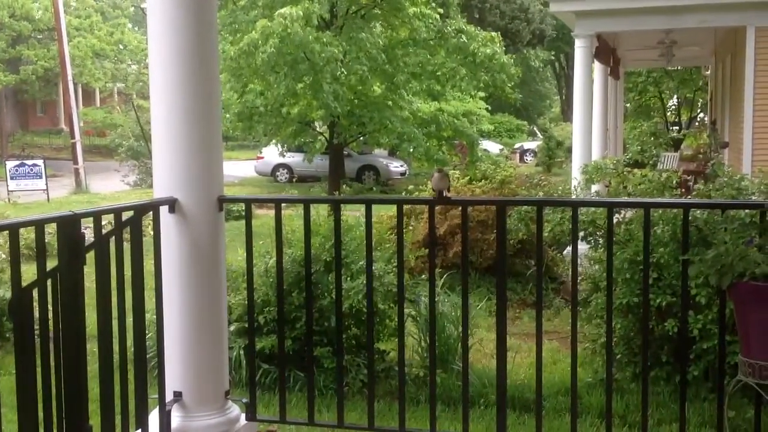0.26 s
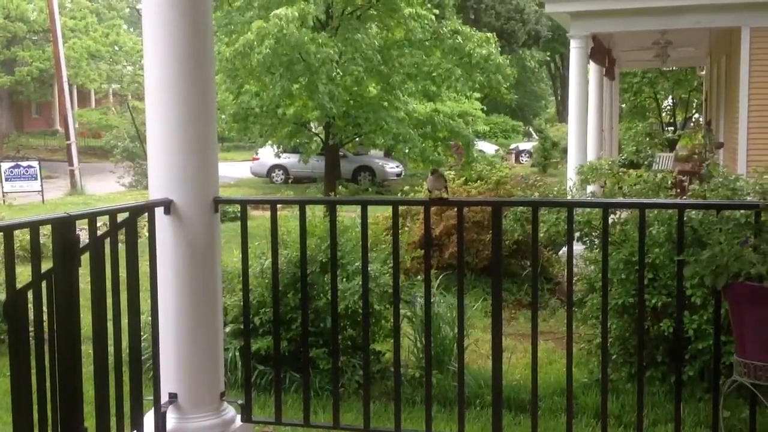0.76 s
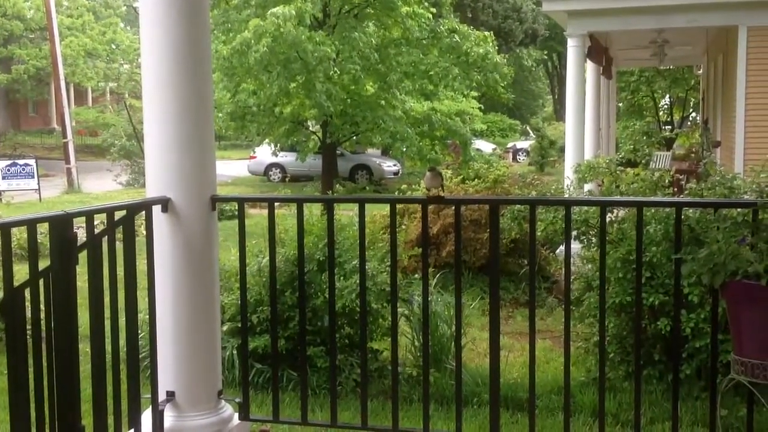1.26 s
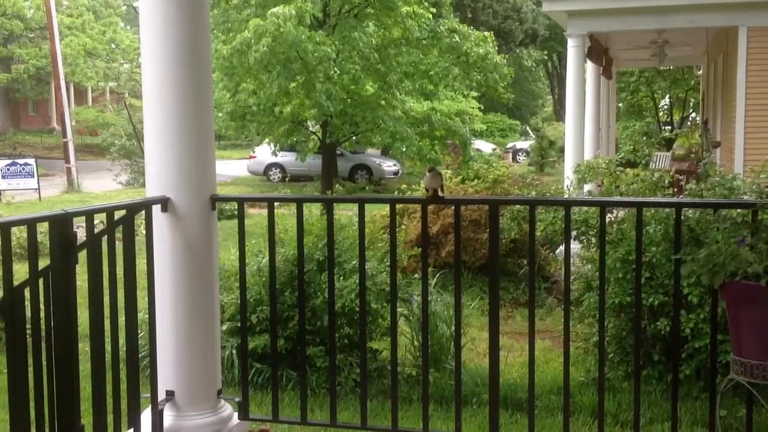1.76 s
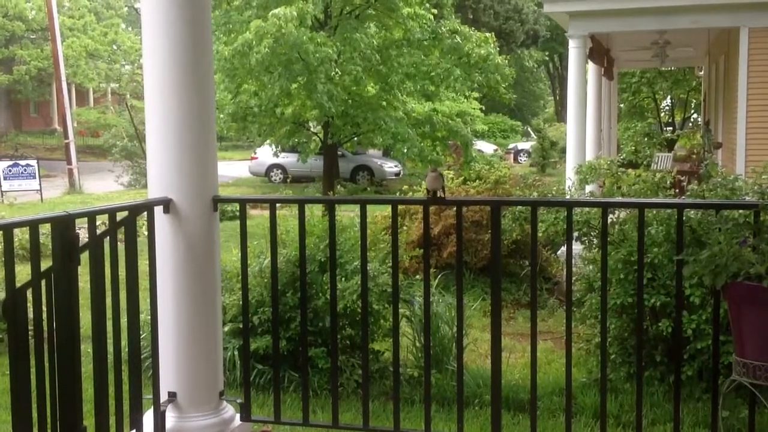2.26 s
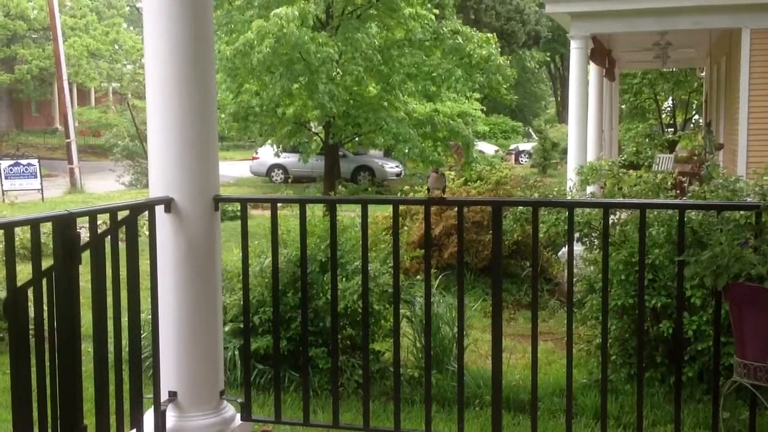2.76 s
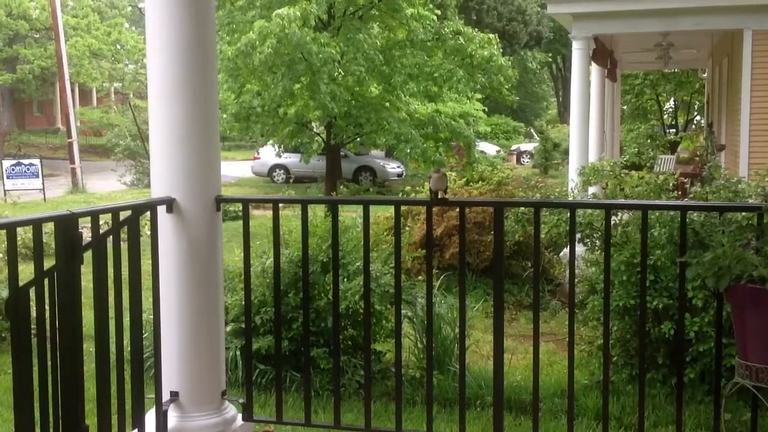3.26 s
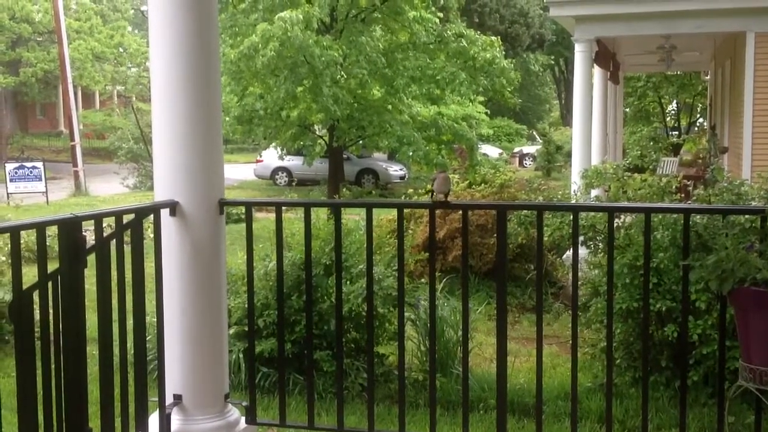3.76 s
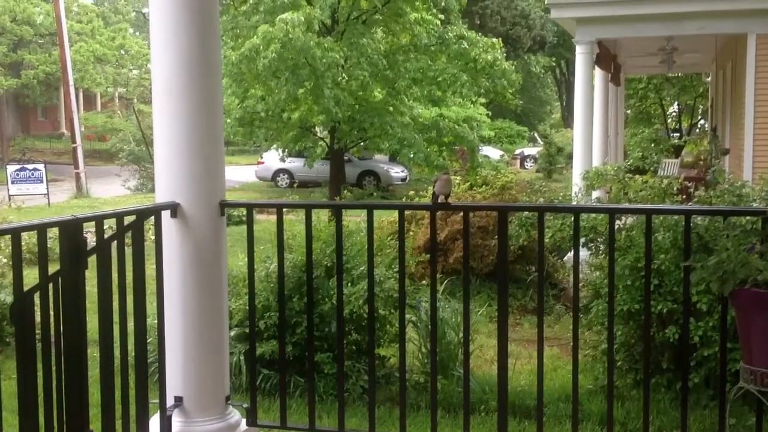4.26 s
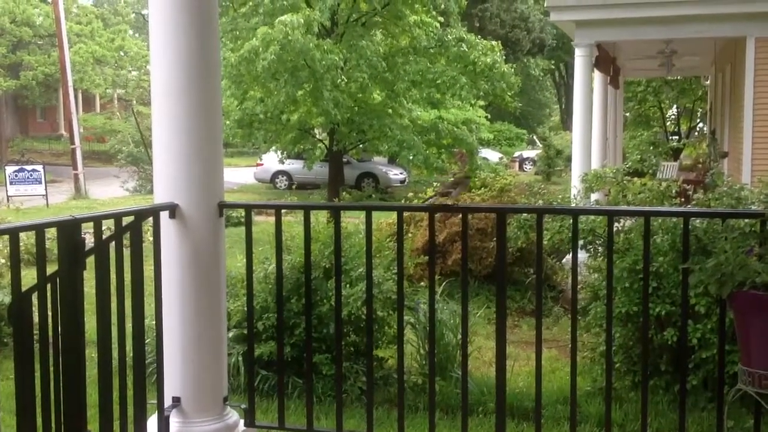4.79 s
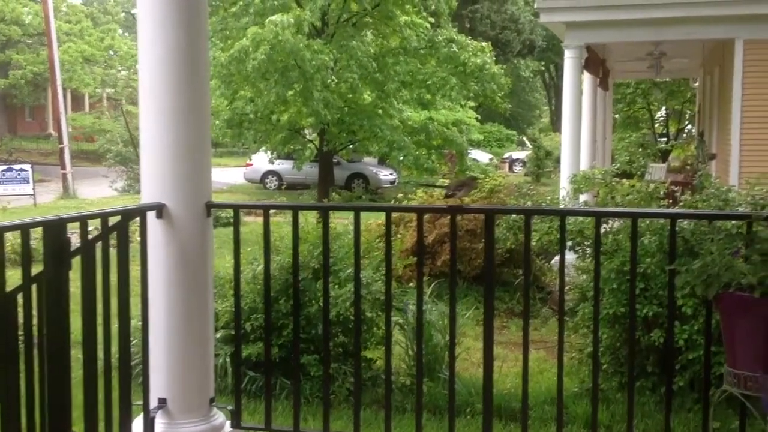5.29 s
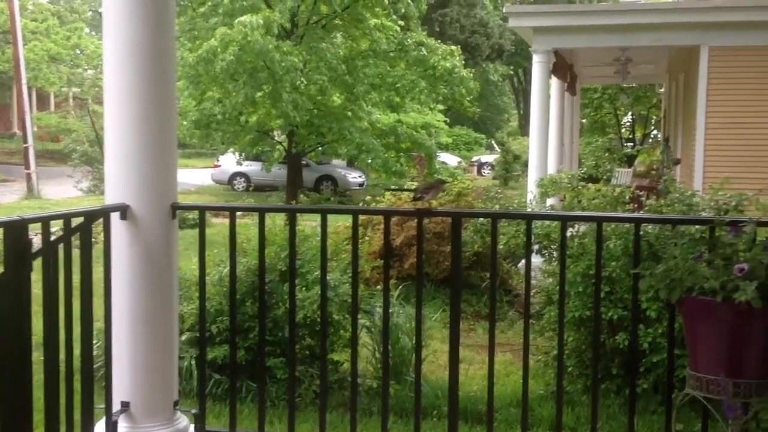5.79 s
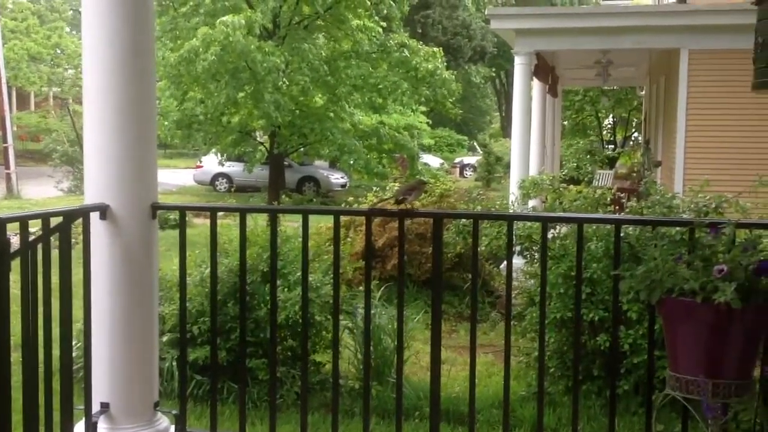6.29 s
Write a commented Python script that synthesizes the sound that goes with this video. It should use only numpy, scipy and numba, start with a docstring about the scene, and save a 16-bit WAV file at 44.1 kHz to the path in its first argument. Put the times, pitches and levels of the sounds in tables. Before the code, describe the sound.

A mockingbird on a porch railing gives six short, harsh, rasping barks: three about a second apart, then a two-second pause, then three more. Each has a quick, slight echo from the porch. Behind it, distant songbirds whistle and chirp faintly over a soft, steady wash of far traffic and leaves. A few tiny handling clicks come from the microphone on the porch.

```python
"""Far songbirds whistle in a garden over a faint town hum; a few small handling clicks come and go.
Then a mockingbird on a porch railing scolds with six harsh, rasping barks.
One side of its syrinx holds a sagging tone while the other flaps chaotically;
throat, windpipe and beak colour both, and the porch echoes them."""
import sys
import numpy as np
from scipy import signal
from scipy.fft import rfft, irfft, next_fast_len
from scipy.io import wavfile
from numba import njit

SR = 44100
rng = np.random.default_rng(int(sys.argv[2]) if len(sys.argv) > 2 else 0)


def waveform_to_disk(signal):
    """Save audio, clipped to [-1, 1], as 16-bit WAV at the path in sys.argv[1]."""
    frames = np.transpose(np.atleast_2d(signal))
    scaled = np.clip(frames, -1, 1) * 32767
    samples = np.round(scaled).astype(np.int16)
    wavfile.write(sys.argv[1], SR, samples)


N = 288414
TIME_S = np.arange(N) / SR


def undb(db):
    """Decibels to gain."""
    return 10 ** (np.asarray(db) / 20)


def unit(x):
    """Scale to rms 1."""
    return x / np.sqrt(np.mean(x ** 2))


def colour(x, points):
    """Filter by a spectrum of (f/Hz, gain/dB) points."""
    hz, db = np.transpose(points)
    size = next_fast_len(len(x) + 2048)
    bins_hz = np.maximum(np.fft.rfftfreq(size, 1 / SR), 1)
    gain = undb(np.interp(np.log(bins_hz), np.log(hz), db))
    return irfft(rfft(x, size) * gain, size)[:len(x)]


def walk(t, rate_hz):
    """Random wander of rms 1, with rate_hz new targets a second."""
    steps = (t - t[0]) * rate_hz
    return unit(np.interp(steps, np.arange(len(t)), rng.standard_normal(len(t))))


@njit
def resonance(x, hz, width_hz):
    """State-variable band-pass with a moving centre."""
    y, band_state, low_state = np.empty(len(x)), 0., 0.
    for i in range(len(x)):
        g, damping = np.tan(np.pi * hz[i] / SR), width_hz / hz[i]
        band = (band_state + g * (x[i] - low_state)) / (1 + g * (g + damping))
        band_state = 2 * band - band_state
        low_state += 2 * g * band
        y[i] = damping * band
    return y


def echoes(x, t60_s, gap_s, dull_hz):
    """Dense reflections of unit energy: a gap, then a decay with softened treble."""
    t = TIME_S[:SR]
    tail = rng.standard_normal(SR) * np.exp(-np.log(1000) * t / t60_s) * (t > gap_s)
    tail = signal.sosfilt(signal.butter(1, dull_hz, fs=SR, output="sos"), tail)
    return signal.fftconvolve(x, tail / np.linalg.norm(tail))[:N]


# Town noise spectrum: f/Hz, relative density/dB
TOWN_SPECTRUM = [(18, -78), (30, -35), (154, -3), (240, -0.5), (426, -5), (662, -3.5), (754, -7.5),
                 (1920, -8), (2560, -14.5), (2770, -15), (3780, -13.5), (4540, -18), (6700, -21),
                 (8690, -24.5), (15000, -27)]


def town(level_db=-57.5, split_hz=700):
    """Far traffic and leaves: a soft wash whose low part wavers under a nearly steady hiss."""
    wash = unit(colour(rng.standard_normal(N), TOWN_SPECTRUM))
    traffic = signal.sosfiltfilt(signal.butter(2, split_hz, fs=SR, output="sos"), wash)
    leaves = wash - traffic
    flicker = undb(.8 * walk(TIME_S, rate_hz=10))
    swell = undb(.4 * walk(TIME_S, rate_hz=2))
    return undb(level_db) * (traffic * flicker + leaves * swell)


def whistle(start_s, length_s, start_hz, end_hz, level_db, warble, bow=0.0055):
    """One far note: a warbling glide, bowed upward midway, that swells and fades."""
    t = TIME_S[:SR // 2 + SR // 8]
    progress = np.minimum(t / length_s, 1)
    arch = np.abs(np.sin(np.pi * progress))
    glide_hz = start_hz + (end_hz - start_hz) * progress
    hz = glide_hz * (1 + bow * arch + warble * walk(t, rate_hz=492.6))
    note = undb(level_db) * np.sqrt(2 * arch) * np.sin(2 * np.pi * np.cumsum(hz) / SR)
    return np.pad(note, (int(start_s * SR), N))[:N]


# Single whistles and chirps: t/s, length/s, start f/Hz, end f/Hz, level/dB, warble/share of pitch
SINGLE_NOTES = [ (0, 0.042, 3330, 3380, -56.5, 0.091), (0.123, 0.23, 7250, 6660, -70.5, 0.011),
                (.332, 0.35, 6840, 6380, -70.5, 0.017), (1.181, 0.12, 4160, 3340, -57.5, .073),
                (1.197, 0.078, 2006, 1667, -59.5, .042), (1.345, 0.072, 3440, 4480, -49.5, 0.093),
                (1.389, 0.047, 2480, 2960, -54.5, .016), (1.401, 0.043, 2330, 2210, -49.5, .023),
                (2.194, 0.06, 3790, 3770, -62.5, .02), (3.128, 0.035, 3590, 3460, -41.5, 0.0041),
                (3.588, 0.031, 3590, 3490, -43.5, 0.0021), (4.224, .11, 4250, 3300, -56, 0.0704),
                (5.038, 0.049, 3040, 3610, -52.5, 0.014), (5.047, 0.049, 2556, 2343, -51.5, 0.021),
                (5.754, 0.0315, 3660, 3300, -42, 0.054), (5.78, 0.031, 3130, 2870, -49, 0.073),
                (5.791, 0.021, 2047, 1830, -47, 0.038), (5.823, 0.029, 2586, 2600, -44.5, 0.018),
                (5.906, 0.071, 4580, 3870, -56.5, 0.045)]
# Songbird phrase: same columns, t/s from the phrase onset
PHRASE_NOTES = [ (0, 0.13, 4050, 4564, -51.5, 0.019), (0.12, 0.12, 2340, 2990, -52.5, .025),
                (0.22, 0.078, 2560, 2300, -52, .07), (0.306, .045, 3670, 3510, -47.5, 0.011)]
# Phrase onsets: t/s
PHRASE_ONSETS_S = [2.793, 3.229]


def songbirds(direct_db=-1.3, trees_db=-9, street_db=-11):
    """Far birds: single whistles and a repeated phrase, scattered by trees and house fronts."""
    phrases = sum(whistle(onset_s + offset_s, *note)
                  for onset_s in PHRASE_ONSETS_S for offset_s, *note in PHRASE_NOTES)
    song = phrases + sum(whistle(*note) for note in SINGLE_NOTES)
    trees = echoes(song, t60_s=0.4, gap_s=0.0027, dull_hz=7000)
    street = echoes(song, t60_s=1.4, gap_s=0.016, dull_hz=5240)
    return undb(direct_db) * song + undb(trees_db) * trees + undb(street_db) * street


# Clicks and soft bumps: t/s, f/Hz, length/s, envelope peak/dB
HANDLING_KNOCKS = [(.509, 4300, 0.00038, -42), (2.3655, 5330, 0.00095, -39.5), (3.664, 424, 0.0077, -46),
                   (6.4217, 2260, 0.002, -38.5), (6.422, 5900, 0.00092, -39), (6.49, 202, 0.016, -42)]


def handling():
    """Small clicks and bumps, each a few quickly damped cycles."""
    out = np.zeros(N)
    for start_s, hz, length_s, peak_db in HANDLING_KNOCKS:
        start, t = int(start_s * SR), TIME_S[:int(length_s * SR)]
        envelope = undb(peak_db) * np.sin(np.pi * t / length_s)
        out[start:start + len(t)] += envelope * np.sin(2 * np.pi * hz * t)
    return out


def rasp(t, hz, jitter=.16, scatter_db=1.5, air_db=-7):
    """Chaotic side of the syrinx: uneven slaps, each letting a puff of air through."""
    cycles = np.cumsum(hz * np.exp(jitter * walk(t, rate_hz=1100))) / SR
    slap_index = cycles.astype(int)
    strength = undb(scatter_db * rng.standard_normal(len(t)))[slap_index]
    slaps = np.diff(slap_index, prepend=0) * strength
    puffs = rng.standard_normal(len(t)) * np.exp(-(cycles % 1) / .5) * strength
    return unit(slaps - slaps.mean()) + undb(air_db) * unit(puffs)


# Clear tone at the syrinx: harmonic number, relative level/dB
SYRINX_PARTIALS = [(1, 3), (2, -.5), (3, -5), (4, -6), (5, -3), (6, -7), (7, -9), (9, -9)]


def tone(t, hz, flutter_db=1.0):
    """Steadier side of the syrinx: a few partials that waver in pitch and level."""
    waver = .008 * walk(t, rate_hz=350)
    phase = 2 * np.pi * np.cumsum(hz * (1 + waver)) / SR
    return unit(sum(undb(db + flutter_db * walk(t, rate_hz=46.9)) * np.sin(harmonic * phase)
                    for harmonic, db in SYRINX_PARTIALS))


# Throat response: f/Hz, gain/dB
THROAT_RESPONSE = [(100, -80), (620, -23.5), (900, -20.5), (1150, -19), (1550, -13), (2000, -9.5),
                   (2400, -8), (2800, -2.5), (4900, -4), (5700, -6.5), (7100, -17), (8700, -13),
                   (10500, -24), (12300, -27.5), (15000, -25)]


def throat(x, shrill_db, hiss_db):
    """Throat colour; posture lifts or sinks the main band's upper flank and the hiss above it."""
    posture = [(4900, 0), (5500, shrill_db), (8000, 0), (11000, hiss_db)]
    return colour(colour(x, THROAT_RESPONSE), posture)


# Windpipe resonances common to all barks: f/Hz, gain/dB, width/Hz
WINDPIPE_MODES = [(1340, -5.5, 200), (13900, 0, 1300)]


def windpipe(x, rings, ring_width_hz=170):
    """Nasal resonances, common ones plus the bark's own rings; partials sliding into them ring out."""
    modes = [(hz, db, ring_width_hz) for hz, db in rings] + list(WINDPIPE_MODES)
    return sum(undb(db) * resonance(x, np.full(len(x), float(hz)), float(width_hz))
               for hz, db, width_hz in modes)


def beak_resonance(x, hz, accent, gape_db, held_db=-7, width_hz=1600.):
    """Gliding two-stage beak resonance: gape_db at the accent, held_db away from it."""
    gain = undb(held_db + (gape_db - held_db) * accent)
    return gain * resonance(resonance(x, hz, width_hz), hz, width_hz)


# Hollow, muffled response of the shut beak: f/Hz, gain/dB
SHUT_BEAK_RESPONSE = [(1300, 3.5), (2600, -16)]


def beak_opening(t, x, open_s=0.02):
    """The opening beak lets the treble out."""
    opening = np.minimum(t / open_s, 1)
    return opening * x + (1 - opening) * colour(x, SHUT_BEAK_RESPONSE)


def bark(row, attack_s=0.011, release_s=0.017, accent_db=2, accent_width_s=0.038,
         sag_steepness=3.2, tone_fade_s=0.024):
    """One accented bark: rasp and tone on a sagging pitch, through throat, windpipe and beak."""
    (start_s, length_s, level_db, fade_db, accent_s, gape_db, beak_start_hz, beak_end_hz,
     start_hz, end_hz, sag_s, tone_db, low_hz, low_db, high_hz, high_db, shrill_db, hiss_db) = row
    start, t = int(start_s * SR), TIME_S[:SR // 3]
    accent = np.exp(-((t - accent_s) / accent_width_s) ** 2)
    pitch_hz = end_hz + (start_hz - end_hz) / (1 + (t / sag_s) ** sag_steepness)
    tone_gain = undb(tone_db) * np.clip((length_s - t) / tone_fade_s, 0, 1)
    syrinx = rasp(t, pitch_hz) + tone_gain * tone(t, pitch_hz)
    voice = throat(syrinx, shrill_db, hiss_db)
    rings = windpipe(voice, [(low_hz, low_db), (high_hz, high_db)])
    beak_hz = np.interp(t, [0, length_s], [beak_start_hz, beak_end_hz])
    beak = beak_resonance(voice, beak_hz, accent, gape_db)
    call = beak_opening(t, unit(voice + rings + beak))
    envelope = np.minimum(t / attack_s, 1) * np.exp(-np.maximum(t - length_s, 0) / release_s)
    effort = envelope * undb(level_db + accent_db * accent - fade_db * t / length_s)
    return np.pad(effort * call, (start, N - start - len(t)))


# Barks: t/s, length/s, level/dB, fade over length/dB, accent delay/s,
#   beak gain at accent/dB, beak start f/Hz, beak end f/Hz,
#   pitch start f/Hz, pitch end f/Hz, half-sag delay/s, tone re rasp/dB,
#   low windpipe ring f/Hz, gain/dB, high windpipe ring f/Hz, gain/dB, shrillness/dB, hiss/dB
SCOLD_BARKS = [ (0.721, 0.25, -27.5, 3.5, 0.073, -8, 3980, 3750, 1037, 930.7, 0.12, -8, 3500, 1, 4160, 0.5, 0, 1),
               (1.49, 0.23, -30, 3.5, 0.062, -2, 3970, 3780, 930.5, 818, .135, -12, 3140, -10, 5670, -12, 0.5, -0.5),
               (2.491, 0.25, -31.5, 1.2, 0.073, 0.5, 4170, 3600, 949, 798.7, .1, -10.5, 1140, -4, 4600, -7, 0.5, 0),
               (4.536, 0.27, -28.5, 0.5, 0.051, 5, 3510, 3750, 1230, 924.7, .075, -8.5, 1160, -30, 4560, 3.5, -7.5, -3.5),
               (5.15, 0.25, -30.5, 0.5, 0.068, -4, 3730, 4100, 974, 858.3, .19, -13, 2720, -1, 4860, -1.5, -3, -2),
               (6.032, 0.2, -29.3, 4.5, 0.056, -29, 3700, 3970, 969.3, 792, .145, -10, 2750, -11, 5160, -6, -1, -1)]


def mockingbird(direct_db=-2, porch_db=-2.5, garden_db=-25):
    """Six barks, with the porch's quick reflections and the garden's faint long ones."""
    barks = sum(bark(row) for row in SCOLD_BARKS)
    porch = echoes(barks, t60_s=0.2, gap_s=0.002966, dull_hz=13400)
    garden = echoes(barks, t60_s=0.96, gap_s=0.035, dull_hz=3020)
    return undb(direct_db) * barks + undb(porch_db) * porch + undb(garden_db) * garden


def scene():
    """Mono mix at the porch."""
    return (mockingbird() + songbirds() + handling() + town())[None]


def record(dry):
    """The phone cuts the top: a steep low-pass."""
    cutoff_hz = 15400
    return signal.sosfilt(signal.ellip(10, .2, 70, cutoff_hz, fs=SR, output="sos"), dry)


dry = scene()
out = record(dry)
waveform_to_disk(out)
```